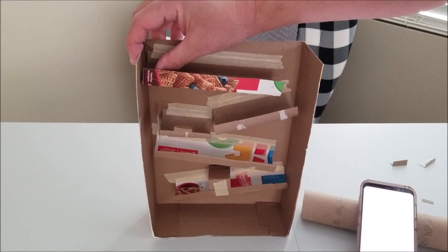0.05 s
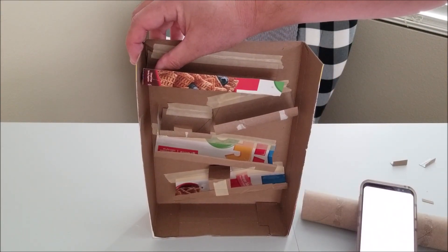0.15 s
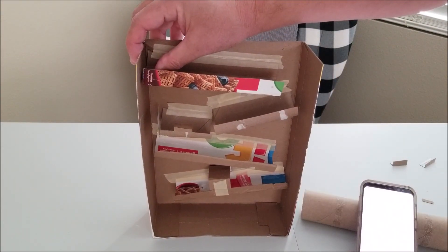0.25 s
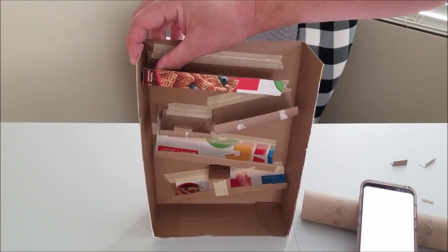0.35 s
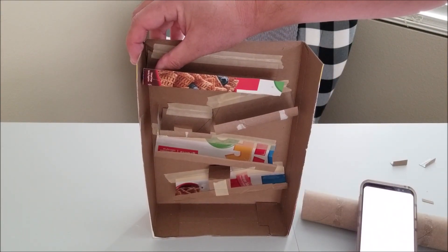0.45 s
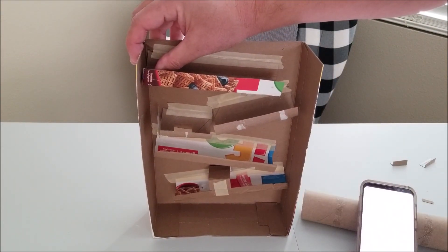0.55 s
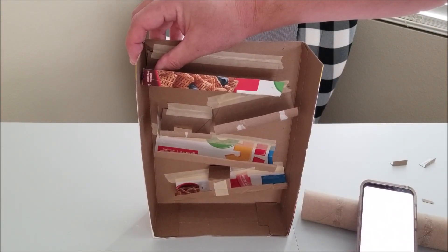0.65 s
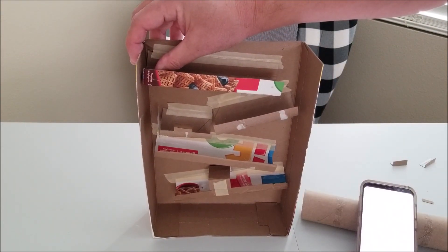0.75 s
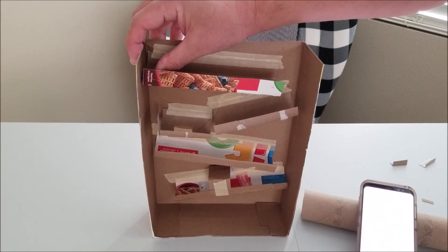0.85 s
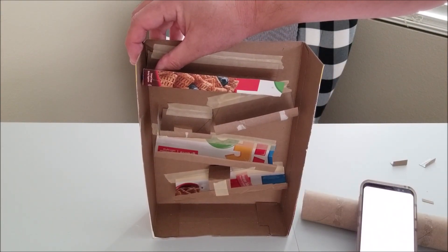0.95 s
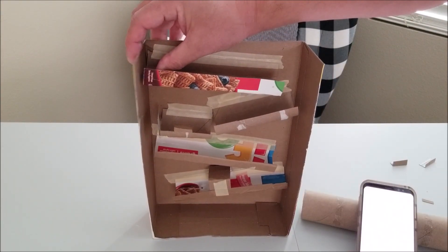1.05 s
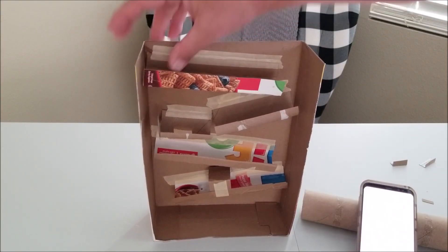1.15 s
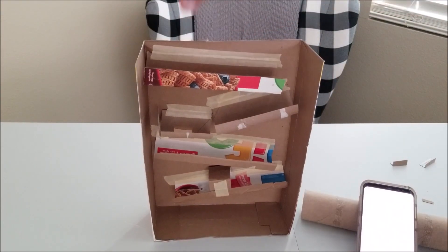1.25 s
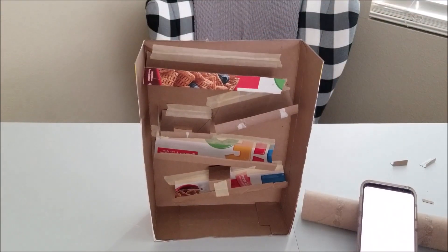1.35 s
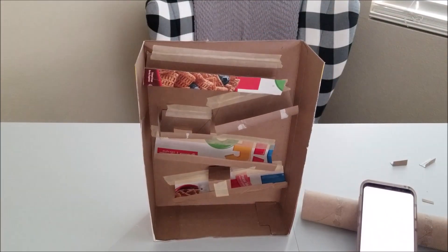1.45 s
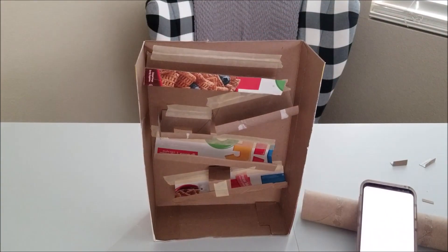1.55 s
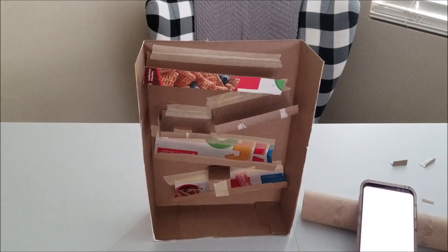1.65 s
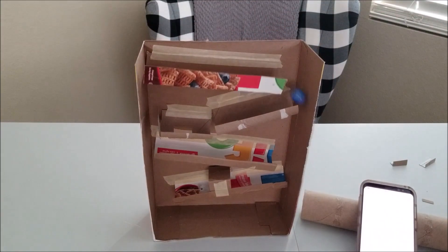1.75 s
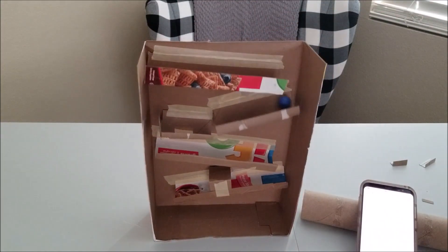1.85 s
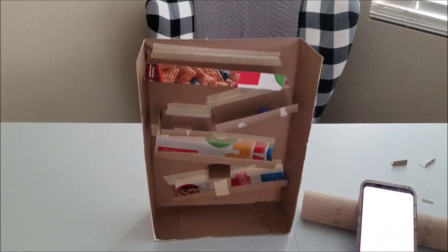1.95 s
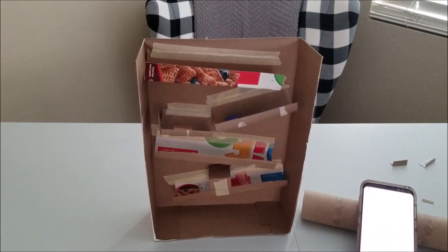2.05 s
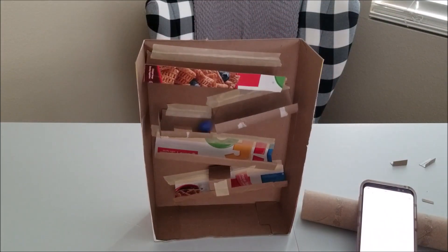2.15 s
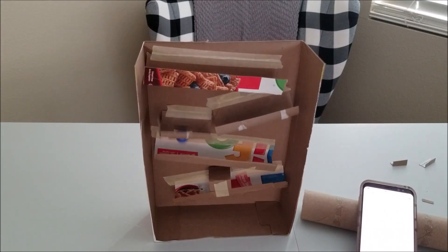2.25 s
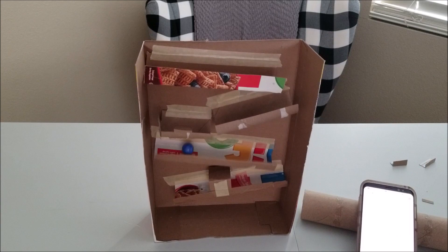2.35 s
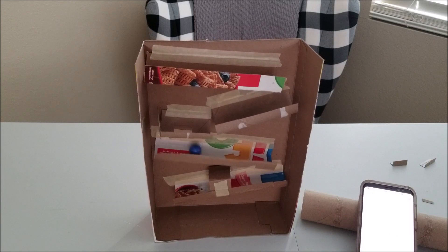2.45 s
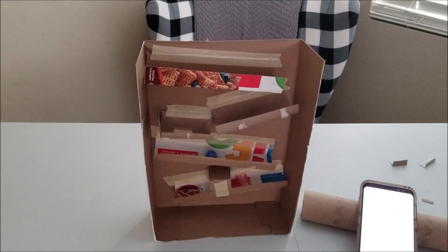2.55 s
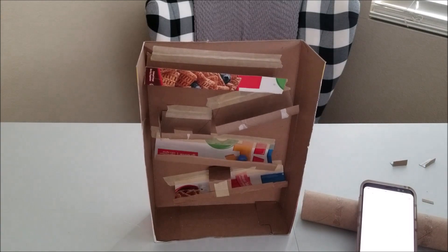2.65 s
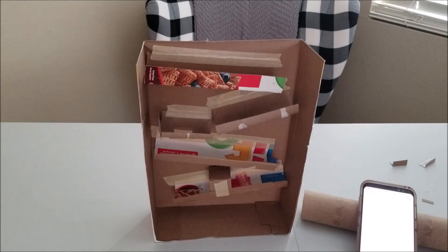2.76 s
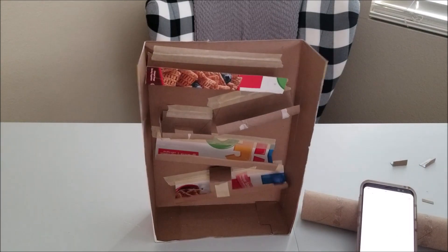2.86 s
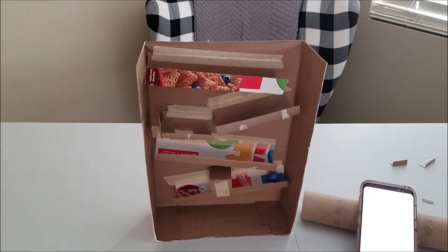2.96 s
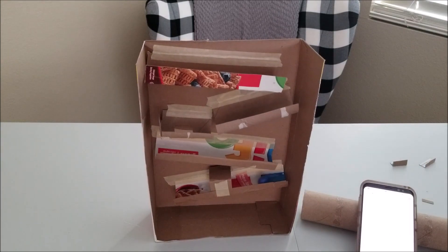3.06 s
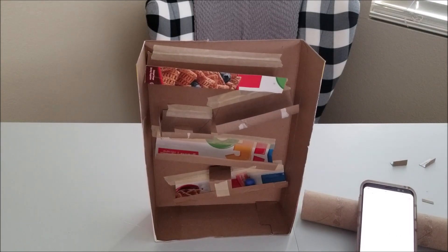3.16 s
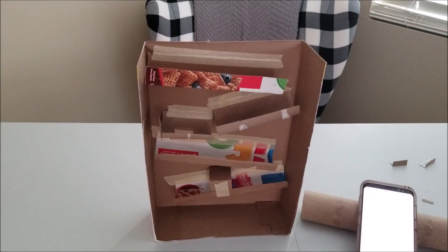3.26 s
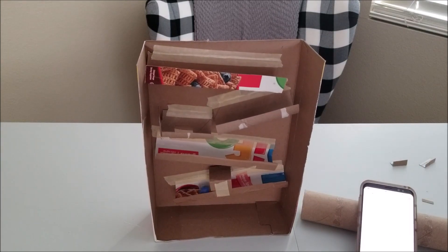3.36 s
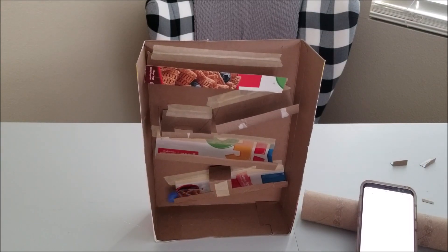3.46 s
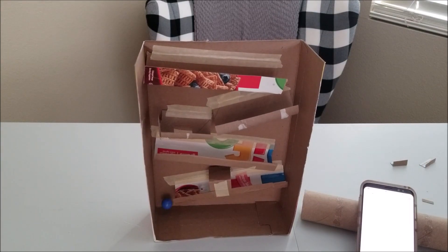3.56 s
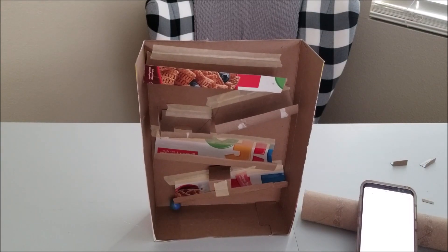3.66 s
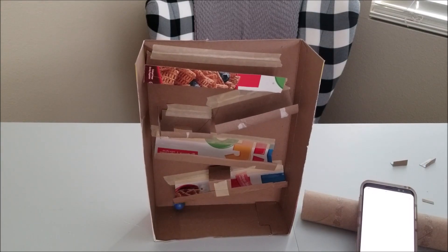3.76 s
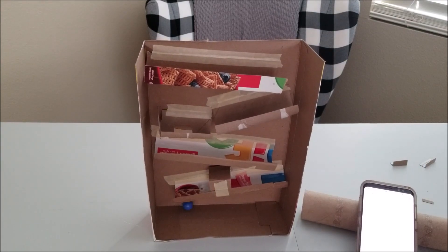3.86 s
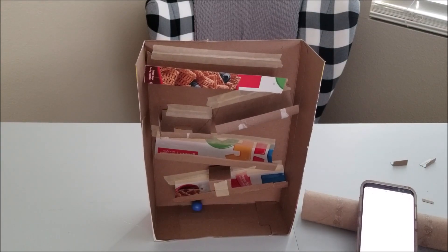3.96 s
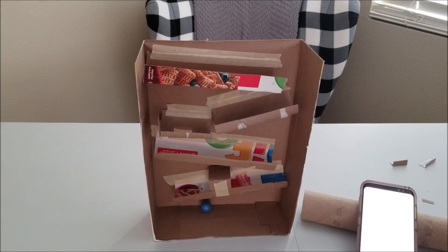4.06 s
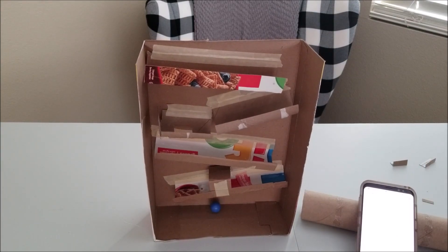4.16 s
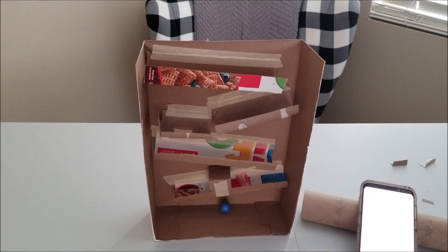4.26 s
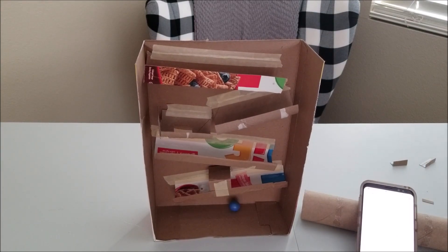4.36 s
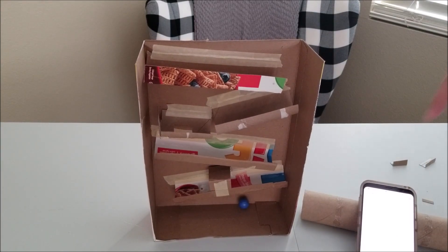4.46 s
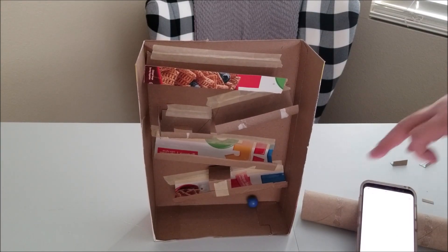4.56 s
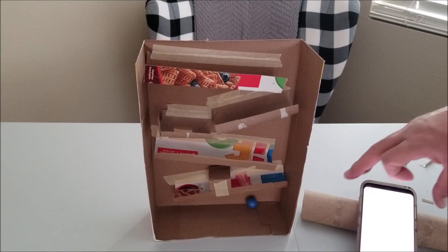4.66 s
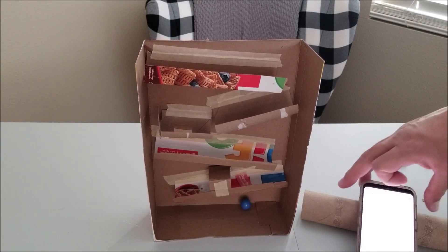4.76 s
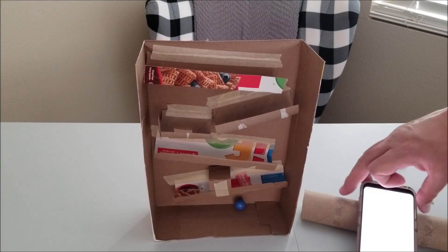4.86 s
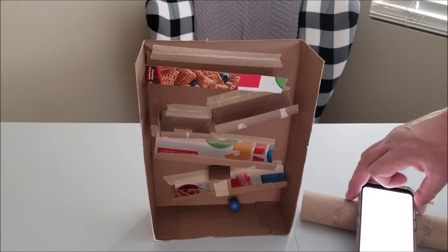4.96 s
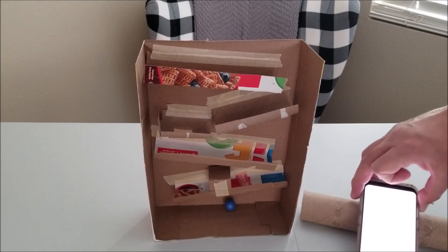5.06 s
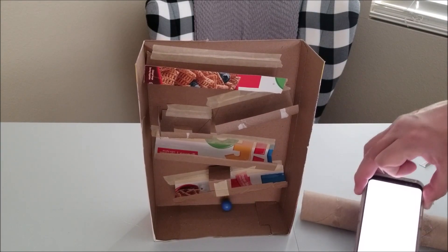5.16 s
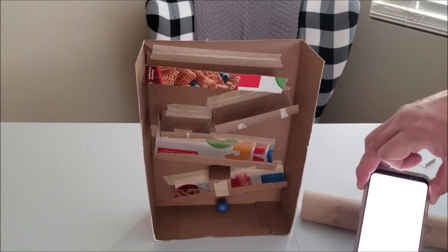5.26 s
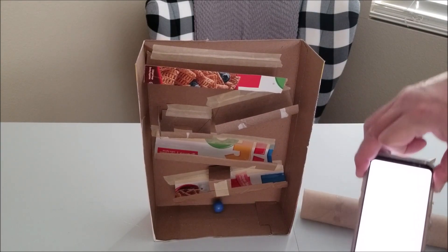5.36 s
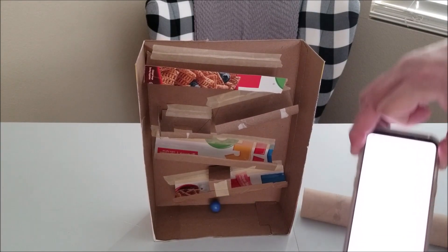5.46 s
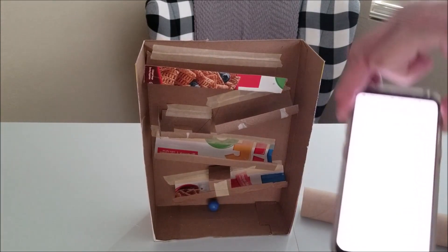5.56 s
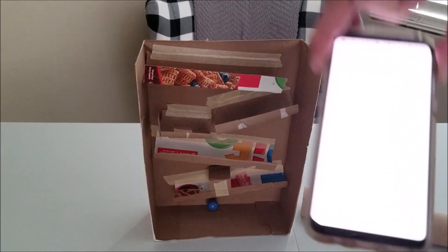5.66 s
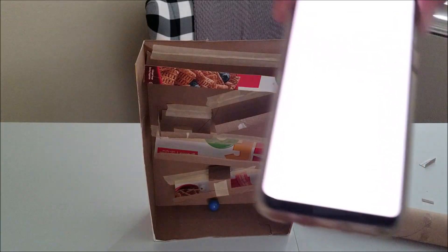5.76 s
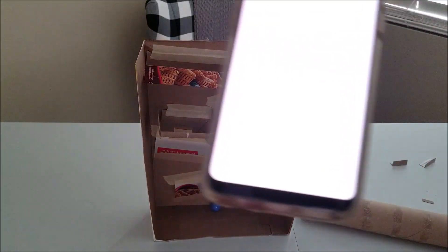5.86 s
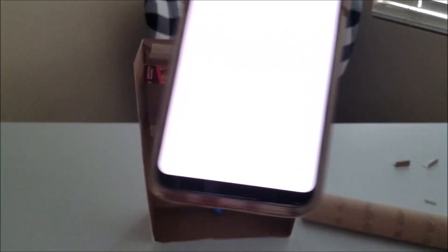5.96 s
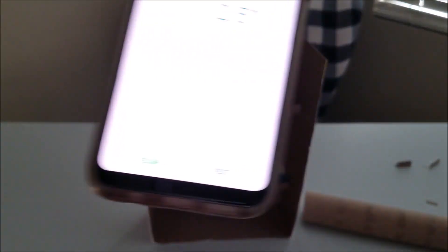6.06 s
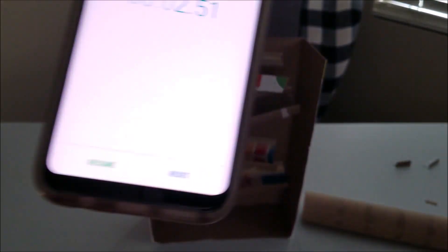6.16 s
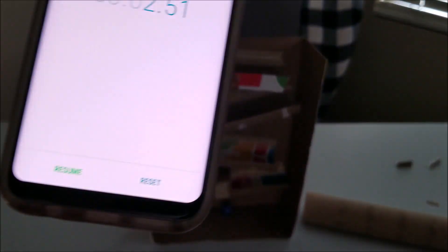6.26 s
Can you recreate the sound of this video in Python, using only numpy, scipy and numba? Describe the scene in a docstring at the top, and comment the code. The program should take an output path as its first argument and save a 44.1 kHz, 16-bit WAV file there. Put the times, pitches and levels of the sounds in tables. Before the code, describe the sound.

A marble rolls down a cardboard ramp run, dropping between ramps with hollow knocks, rocks to rest, then faint taps of a hand lifting a phone.

```python
"""Marble in a cardboard box

Place: a small quiet room, a cardboard box on a table, a stereo pair of microphones close by. A glass marble
rolls down four ramps, drops from one to the next, bounces and rocks to rest on the box floor; then a hand lifts
a phone off a cardboard tube. Blows ring the modes of the box and crack as noise bursts; rolling is dense random
bumps through the same modes. Contacts are short rings and bursts, swells of hiss are shaped noise; further off
lie table boom, a short room tail, house hum and steady hiss."""
import sys
import numpy as np
from scipy import signal
from scipy.fft import rfft, irfft, next_fast_len
from scipy.io import wavfile
from scipy.ndimage import uniform_filter1d
from numba import njit

SR = 44100
rng = np.random.default_rng(int(sys.argv[2]) if len(sys.argv) > 2 else 0)


def log_audio(samples):
    """Write samples as a 16-bit WAV file to the path given in sys.argv[1]."""
    # one column per channel
    frames = np.atleast_2d(samples).T
    # limit to full scale, then quantise
    limited = np.clip(frames, -1, 1)
    pcm = np.round(limited * 32767).astype(np.int16)
    wavfile.write(sys.argv[1], SR, pcm)


N = 278727

# Marble blows; levels are drives, trimmed per layer: (time [s], ramp ring [dB], struck spot pitch [Hz],
# box walls [dB], panel [dB], panel pitch [Hz], click [dB], top of click [dB])
MARBLE_BLOWS = [(1.142, -48, 1660, -44.5, -45, 467, -69, -58),
                (1.168, -36, 1720, -64, -47.5, 470, -53.5, -65),
                (1.196, -43, 1680, -47.5, -69, 600, -68, -72),
                (1.254, -48, 1500, -79, -68, 436, -73, -56.5), (1.506, -36, 1060, -52, -59, 670, -53, -64),
                (1.574, -42.5, 1650, -71, -47.5, 620, -52, -65),
                (1.709, -34.5, 1330, -55, -68, 710, -52, -55),
                (1.756, -42, 1800, -72, -52, 640, -56.5, -48),
                (1.826, -22.5, 840, -28, -24, 740, -40.5, -35.5),
                (1.836, -36, 870, -30, -26.5, 480, -45, -60), (1.85, -25.5, 1360, -33, -39, 720, -54, -48),
                (1.894, -49, 1500, -38, -36, 408, -49.5, -66),
                (1.953, -37.5, 1430, -49, -34.5, 407, -45.5, -47),
                (2.044, -35, 880, -44, -38.5, 400, -58, -50),
                (2.122, -32.5, 1150, -46, -37, 477.4, -82, -63),
                (2.202, -27.5, 1900, -28.5, -25, 561.6, -40.5, -35.5),
                (2.26, -34.5, 1070, -33, -30.5, 410, -49, -45),
                (2.337, -31.5, 1300, -41, -48, 794, -43.5, -37),
                (2.346, -17.5, 1550, -28, -32, 779, -25.5, -29.5),
                (2.45, -20.5, 1190, -49, -62.5, 790, -36, -51),
                (2.456, -19.5, 830, -29.5, -44, 732, -41.5, -45),
                (2.472, -43, 1280, -52.5, -57.5, 770, -42, -51),
                (2.501, -25.5, 1140, -55.5, -67.5, 789, -35.5, -45),
                (2.546, -30, 960, -39, -74, 748, -45, -44), (2.557, -33, 1760, -44, -47, 720, -36, -40),
                (2.567, -32.5, 963, -43.5, -64, 729, -42.5, -46),
                (2.624, -34.5, 870, -47, -54.5, 790, -51.5, -75),
                (2.779, -38, 1070, -58.5, -46.5, 377, -54.5, -53),
                (2.865, -25.5, 890, -28.5, -22, 550, -58, -45),
                (2.897, -25.5, 2120, -32.5, -32.5, 556, -41.5, -46.5),
                (2.923, -19.5, 1480, -31, -36, 725, -29.5, -30.5),
                (2.996, -26, 1340, -35.5, -40, 374, -31.5, -41),
                (3.017, -38, 1370, -42, -43.5, 470, -39, -49),
                (3.109, -36, 2680, -47.5, -49, 789, -49, -46.5),
                (3.12, -40.5, 810, -55.5, -60, 420, -53, -69),
                (3.266, -39.5, 2570, -46, -80, 800, -47.5, -45.5),
                (3.413, -38, 1400, -54.5, -72.5, 777, -42, -44.5),
                (3.463, -33.5, 750, -44.5, -43.5, 766, -46.5, -44.5),
                (3.537, -19.5, 950, -30, -28, 634, -33.5, -32),
                (3.565, -18, 745, -22.5, -23.5, 738, -24.5, -27),
                (3.67, -27, 1260, -27.5, -30.5, 640, -30.5, -30),
                (3.747, -32.5, 1010, -29.5, -34.5, 382, -32.5, -34),
                (3.804, -37.5, 1020, -47, -35.5, 470, -44.5, -50),
                (3.846, -35, 947, -38.5, -38.5, 640, -42, -32),
                (3.876, -40.5, 904, -39, -43, 563, -45.5, -53),
                (3.895, -39, 820, -40.5, -45.5, 550, -51, -52)]
# Contacts of hand, phone and tube; levels are drives: (time [s], ring [dB], pitch [Hz], second ring [dB],
# second pitch [Hz], thud [dB], click [dB], left minus right [dB])
HAND_CONTACTS = [(4.543, -41.5, 1147, -72, 1300, -53, -57, 7.5), (4.55, -35, 580, -79, 1330, -56, -60.5, 3),
                 (4.6, -37.5, 1070, -80.5, 1570, -75.5, -77, 7), (4.672, -35, 807, -63, 1760, -52, -53, 7),
                 (4.688, -30.5, 723, -60, 1750, -59, -63, 12), (4.7, -41, 730, -60, 1810, -47, -49, 8.5),
                 (5.025, -40, 606, -56, 1230, -54, -60, 2), (5.044, -43, 790, -62, 1383, -54, -73, 12.5),
                 (5.068, -47, 734, -73, 1420, -58.5, -72, -12),
                 (5.109, -54, 700, -88, 1440, -61.5, -80, 11),
                 (6.147, -41, 3430, -57, 1750, -70, -52, -0.5), (6.161, -51, 3670, -63, 1690, -64, -66, 8),
                 (6.187, -33, 3490, -59, 2780, -62.5, -52, 5.5),
                 (6.198, -61.5, 3580, -63.5, 2710, -85, -72, 1.5),
                 (6.216, -52, 3740, -66, 2754, -82, -63, 4.0)]
# Rolling, one list per ramp and one for the bounces on the box floor: (time [s], ramp [dB], rattle [dB],
# panel [dB], box walls [dB], ramp pitch [Hz])
ROLLING_PATH = [
    [(1.1, -75, -79, -87, -74, 1617), (1.172, -71, -79, -82, -65, 1600),
     (1.3, -70.5, -73.5, -88, -71.5, 1490), (1.506, -56.5, -59.5, -58.5, -58.5, 1144),
     (1.62, -54, -58, -58, -60, 1170), (1.644, -52, -52, -57.5, -59, 1359),
     (1.692, -51, -53.5, -56, -61.5, 1218), (1.758, -49.5, -50, -47.5, -55.5, 1353),
     (1.815, -88, -73, -73, -64, 1352)],
    [(1.83, -51, -50, -50, -54, 1074), (1.93, -54.5, -60.5, -52, -56, 1366),
     (1.978, -52.5, -60.5, -54, -56, 1404), (2.018, -59, -63.5, -49, -51.5, 950),
     (2.226, -56, -65.5, -51.5, -48.5, 1118), (2.282, -55.5, -65, -53, -54.5, 1049),
     (2.302, -67, -71, -64, -50, 1500), (2.38, -62, -53.5, -61.5, -48.5, 1518),
     (2.44, -54.5, -63, -61.5, -53.5, 1470)],
    [(2.45, -63, -57.5, -58.5, -57, 1018), (2.522, -56.5, -53.5, -63.5, -56, 1160),
     (2.544, -57, -63, -61, -51.5, 1036), (2.642, -53, -59.5, -67.5, -57.5, 965),
     (2.742, -51, -60, -61, -52.5, 1107), (2.778, -51.5, -60, -61.5, -59, 1010),
     (2.83, -51.5, -56, -61, -57.5, 1191), (2.86, -57.5, -63, -63, -55, 1066)],
    [(2.87, -53, -60, -59, -53.5, 1042), (2.91, -50.5, -57, -61, -64.5, 1469),
     (2.962, -55, -60, -56.5, -44, 1430), (3.09, -62.5, -68.5, -72, -55, 1300),
     (3.192, -65, -71, -74.5, -59, 1405), (3.242, -66.5, -68, -84, -58.5, 1100),
     (3.31, -63.5, -65, -79.5, -54, 1180), (3.41, -61, -58, -73.5, -50.5, 1500),
     (3.53, -62.5, -68.5, -64.5, -57, 1035)],
    [(3.54, -58, -52.5, -64, -51.5, 1081), (3.588, -56, -54, -59.5, -53, 1020),
     (3.612, -57, -55, -58.5, -50.5, 1183), (3.702, -59, -59, -58.5, -48, 1161),
     (3.752, -57, -56, -65, -45, 1051), (3.798, -57, -60, -65, -49.5, 1070),
     (3.886, -80, -69, -73, -55, 930), (3.952, -79, -77, -74, -61, 1002),
     (4.08, -85, -88, -88.5, -77, 1375)],
]
# Modes of the box, walls first, then panels and ramps; each layer may shorten the decay:
# (frequency [Hz], relative level [dB], t60 [s])
BOX_MODES = [(140.6, 0, 0.25), (203.5, 1, 0.1), (236.5, -7, 0.23), (269.7, 2.5, 0.13), (331.5, -3.5, 0.23),
             (389.4, 1.5, 0.094), (470, -0.5, 0.12), (565.8, -1, 0.15), (640, -2.5, 0.12), (713, -1, 0.057),
             (868, 6, 0.037), (1010, 5, 0.031), (1190, 12, 0.016), (1430, 9.5, 0.027), (1583, 13, 0.016),
             (1900, 3, 0.069), (2198, 6, 0.017), (2404, 2, 0.017), (2780, -7.5, 0.12), (3230, -7.5, 0.023),
             (3430, -12.5, 0.01), (4100, -12, 0.022)]
# Spectrum shape of room hum and microphone hiss: (frequency [Hz], relative density [dB per Hz])
AIR_SPECTRUM = [(15, -57.5), (30, -16), (50, -9), (114, -2.5), (163, -2), (200, -10), (280, -7),
                (330, -14.5), (500, -25), (1900, -28.5), (4500, -35.5), (8400, -44), (11500, -26.5),
                (16500, -23)]
# Each piece of card, in the order of ROLLING_PATH: (fine hiss against rattle [dB], top hiss against rattle [dB],
# rolling panel pitch [Hz], rolling wall pitch [Hz], blow wall pitch [Hz], blow left minus right [dB])
CARD_PIECES = [(-11.5, -11, 670, 220, 162, 3.1), (-3.5, -2.5, 420, 245, 270, 2.7),
               (-6.5, -6.5, 400, 215, 160, 2.6), (-4, -12.5, 390, 220, 270, 3.7),
               (-1.5, -7.5, 550, 200, 180, 2.8)]
# The marble rocks to and fro on the box floor, one swell a swing:
# (middle time [s], length [s], box walls [dB], panel [dB])
FLOOR_SWINGS = [(4.104, .12, -60.5, -83), (4.215, 0.2, -59.5, -70), (4.354, 0.14, -53.5, -74.5),
                (4.55, 0.18, -57, -73), (4.719, 0.16, -59.5, -75), (5.05, 0.31, -64, -71.5),
                (5.39, 0.28, -66.5, -87), (5.826, 0.31, -71.5, -74)]
# Swells of hiss: fine and top hiss that rises, holds and fades, some with mid-band noise:
# (start time [s], rise [s], hold [s], fall [s per 20 dB, at least 0.01],
# 0.6-2.3 kHz level [dB], 3.2-7.1 kHz level [dB], 10.5-18 kHz level [dB])
HISS_SWELLS = [(1.11, 0.029, 0.053, 0.34, -64, -69, -67.5), (1.265, 0.053, 0.067, 0.12, -87, -65, -53.5),
               (3.238, 0.18, .02, 0.05, -74, -71.5, -66), (3.748, 0.12, 0.082, 0.19, -74, -64.5, -56),
               (4.506, 0.035, 0.075, -0.37, -76, -80, -76.5), (4.66, 0.014, .03, 0.15, -67.5, -69, -80),
               (4.897, 0.08, 0.035, 0.2, -75.5, -76, -72), (6.127, 0.053, 0.019, .2, -84, -83, -75)]

PANEL_HZ, RAMP_HZ = 370, 800  # walls ring below the first, panels between, ramps above the second
SETTLE_PANEL_HZ, SETTLE_WALL_HZ = 420, 205  # pitches while the marble rocks on the floor
SNAP_DB, SNAP_CLICK_SHARE = -4.5, 0.67  # trim; place of the snap between ramp ring (0) and click (1)
RING_SHARE = 0.68  # ramp decay of a blow, as a share of the mode's t60
BOOM_DB, BOOM_ROLL_DB = -18.5, -16.5  # table boom against a blow's walls and against rolling walls
BOOM_S = 0.029  # time from a blow to the boom's peak
ROOM_T60_S, ROOM_DB = 0.2, -6
AIR_DB = -68.5  # level of the part common to both microphones, before the left-right offset
TOP_HZ = 15950


def knocks(spread_oct=0.31, scatter_db=3.5, detune=0.037):
    """Each blow rings all modes of the box; modes near the pitches of the struck spot ring most."""
    s, ramp_db, spot_hz, wall_db, panel_db, panel_hz, click_db, top_db = np.transpose(MARBLE_BLOWS)
    wall_hz, pan_db = card_at(s)[-2:]
    snap_db = SNAP_DB + ramp_db + SNAP_CLICK_SHARE * (click_db - ramp_db)
    chance = rng.standard_normal((len(s), 3, 2 * len(BOX_MODES)))
    out = crack(blows(s, undb(click_db), pan_db), 4000, 9500, 0.0023)
    out += crack(blows(s, undb(top_db), pan_db + 2.0), 11000, 17000, 0.0026)
    out += crack(blows(s, undb(snap_db), pan_db), 2000, 3790, 0.0069)
    # uneven card splits every mode into a close pair
    hz, mode_db, t60 = np.repeat(np.transpose(BOX_MODES), 2, axis=1)
    is_wall, is_panel = hz < PANEL_HZ, hz < RAMP_HZ  # walls are picked out first
    decay_s = np.maximum(t60 * np.where(is_panel, 1, RING_SHARE), .005)
    sign = (-1) ** (np.arange(len(hz)) // 2)
    # slower blows stay in contact longer
    contact_ms = np.clip(0.17 * undb(-.7 * (ramp_db + 24.5)), .05, 5.0)
    t = np.arange(8192) / SR
    for k in range(len(s)):
        scatter, shift, phase = chance[k]
        place_hz = np.where(is_wall, wall_hz[k], np.where(is_panel, panel_hz[k], spot_hz[k]))
        near_db = np.maximum(-6 * (np.log2(hz / place_hz) / spread_oct) ** 2, -10)
        part_db = np.where(is_wall, wall_db[k] - 7.0, np.where(is_panel, panel_db[k] - 9.5, ramp_db[k] - 12))
        gain = sign * undb(part_db + near_db + mode_db + scatter_db * scatter)
        # each mode is detuned a little at random from blow to blow
        pole = 2j * np.pi * hz * (1 + detune * shift) - np.log(1000) / decay_s
        # short waves reach the two microphones out of step
        step = np.exp(1j * np.outer([1, -1], phase * hz / 3000))
        step = step * undb(np.array([[pan_db[k]], [-pan_db[k]]]) / 2)
        ringing = np.imag((gain * step) @ np.exp(np.outer(pole, t)))
        # the ring builds up over the contact
        build_up = 1 - np.exp(-t * 1000 / contact_ms[k])
        at = int(s[k] * SR)
        out[:, at:at + len(t)] += ringing * build_up
    return out


def rolling(bumps_per_s=3000, bump_db=2.5):
    """The marble runs over the grain of the card: dense uneven bumps shake ramp, panels, walls and table."""
    ramp_gain, rattle_gain, panel_gain, wall_gain, ramp_hz, card = course()
    panel_hz, wall_hz = card[2:4]
    t = np.arange(N) / SR
    settling = t > ROLLING_PATH[-1][-1][0]
    for s, length_s, wall_db, panel_db in FLOOR_SWINGS:
        swing = np.cos(np.pi * np.clip((t - s) / length_s, -.5, .5))
        wall_gain = wall_gain + undb(wall_db) * swing
        panel_gain = panel_gain + undb(panel_db) * swing
    panel_hz = np.where(settling, SETTLE_PANEL_HZ, panel_hz)
    wall_hz = np.where(settling, SETTLE_WALL_HZ, wall_hz)
    size_db = bump_db * np.minimum(rng.exponential(size=(2, N)), 3.0) + 2.0 * walk(60)
    hits = rng.random((2, N)) < bumps_per_s / SR
    shared, apart = hits * undb(size_db) * np.sign(rng.standard_normal((2, N)))
    bumps = shared + 0.46 * apart * np.array([[1], [-1]])  # left, right
    # where the marble is decides which modes of wall and ramp it shakes most
    walls = unit(svf(box_modes(bumps[0], 100, PANEL_HZ, 0.49), wall_hz, 2.5))
    panels = unit(svf(box_modes(bumps[0], PANEL_HZ, RAMP_HZ, 0.36), panel_hz, 6.7))
    ramp = box_modes(bumps, RAMP_HZ, 1700, 1.0) + .8 * unit(band(bumps, 800, 1800))
    ramp = unit(np.array([svf(side, ramp_hz, 4.6) + 0.19 * side for side in ramp]))
    rattle = unit(box_modes(bumps, 1500, 3500, .4) + .5 * unit(band(bumps, 1500, 3500)))
    body = ramp_gain * ramp + rattle_gain * rattle + panel_gain * panels + wall_gain * walls
    return (body + boom(wall_gain)) * undb(np.array([[1.6], [-1.6]]))


def box_modes(x, lo_hz, hi_hz, decay_share):
    """Pushes ring the box modes of one frequency range, at rms 1."""
    total = sum(undb(db) * ring(x, hz, decay_share * t60) for hz, db, t60 in BOX_MODES if lo_hz < hz < hi_hz)
    return unit(band(total, lo_hz, hi_hz))


def course():
    """Rolling controls, one value a sample: gains of ramp, rattle, panel and walls, ramp pitch, the card underneath."""
    t = np.arange(N) / SR
    s, *levels_db, ramp_hz = np.concatenate(ROLLING_PATH).T
    moving = (t > s[0]) & (t < s[-1])
    gains = [moving * undb(np.interp(t, s, db)) for db in levels_db]
    return gains + [np.interp(t, s, ramp_hz), card_at(t)]


def card_at(s):
    """Columns of CARD_PIECES for the card under the marble at each time."""
    changes_s = [piece[0][0] - .01 for piece in ROLLING_PATH[1:]]
    return np.array(CARD_PIECES, float)[np.searchsorted(changes_s, s)].T


def boom(wall_gain):
    """The table under the box booms late after every blow and rumbles under the rolling."""
    s, wall_db = np.transpose(MARBLE_BLOWS)[[0, 3]]
    coarse_t = np.arange(N)[None, ::64] / SR
    age = np.maximum(coarse_t - s[:, None], 0) / BOOM_S
    swell = np.sqrt(undb(2 * (wall_db + BOOM_DB)) @ (age * np.exp(1 - age)) ** 2)  # powers add
    noise = rng.standard_normal(N) + 0.41 * rng.standard_normal((2, N))
    noise = unit(band(band(noise, 41, 97), 31, 160))
    return noise * (np.repeat(swell, 64)[:N] + undb(BOOM_ROLL_DB) * wall_gain)


def taps():
    """Light contacts of fingers, phone case and tube: a short ring, a broad knock, a dull thud, a tick."""
    s, ring_db, pitch_hz, second_db, second_hz, thud_db, click_db, pan_db = np.transpose(HAND_CONTACTS)
    out = crack(blows(s, undb(click_db), pan_db), 2200, 24000, 0.00092)
    out += ring(blows(s, undb(thud_db - 2.5), pan_db), 181.4, 0.11)
    out += ring(blows(s, undb(thud_db - 3.5), pan_db), 130, 0.28)
    knock = crack(blows(s, undb(ring_db - 8.5), pan_db), 309, 2900, 0.0061)
    push = blows(s, 1, pan_db)
    edges = np.append((s * SR).astype(int), N)
    for k in range(len(s)):
        # the knock is tuned around this contact's pitch until the next contact
        now = slice(edges[k], edges[k + 1])
        out[:, now] += band(knock[:, now], .7 * pitch_hz[k], 1.3 * pitch_hz[k])
        # this contact alone, spread over five samples
        tail = slice(edges[k], edges[k] + 4096)
        one = push[:, tail] * (np.arange(N)[tail] == edges[k])
        one = uniform_filter1d(one, size=5, origin=2)
        out[:, tail] += undb(ring_db[k] - 15) * ring(one, pitch_hz[k], 0.023)
        out[:, tail] += undb(second_db[k] - 6.0) * ring(one, second_hz[k], 0.068)
    return out


def hiss():
    """Fine flickering noise, mostly unrelated at the two microphones, follows the rolling and rises in swells."""
    _, rattle_gain, *_, card = course()
    t = np.arange(N) / SR
    gains = np.array([0 * rattle_gain, rattle_gain * undb(card[0]), rattle_gain * undb(card[1])])
    for s, rise_s, hold_s, fall_s, *db in HISS_SWELLS:
        rise = np.clip((t - s) / max(rise_s, .003), 0, 1) ** 2
        fall = undb(-20 * np.maximum(t - s - rise_s - hold_s, 0) / max(fall_s, .01))
        gains = gains + undb(db)[:, None] * rise * fall
    mid = unit(band(rng.standard_normal(N) + .6 * rng.standard_normal((2, N)), 600, 2300))
    mid = undb(3.0 * walk(90)) * mid
    fine = unit(band(rng.standard_normal((2, N)), 3200, 7100))
    top = unit(band(rng.standard_normal((2, N)), 10500, 18000))
    both = gains[0] * mid + undb(1.5 * walk(30)) * (gains[1] * fine + gains[2] * top)
    return both * undb(np.array([[1.8], [-1.8]]))


def room(x):
    """Reflections of table and walls: a fading noise tail per microphone, alike in the bass."""
    t = np.arange(int(.5 * SR)) / SR
    shared, own = rng.standard_normal(len(t)), rng.standard_normal((2, len(t)))
    tail = band(shared, 40, 890) + undb(9) * band(own, 750, 5000) + undb(7.5) * band(own, 5500, 15000)
    fade = np.exp(-np.log(1000) * t / ROOM_T60_S) * (t > .003)  # first reflections after 3 ms
    tail = unit(tail) * fade * np.sqrt(2 * np.log(1000) / ROOM_T60_S / SR)  # near unit energy
    mono = np.tile(x.mean(axis=0), (2, 1))
    return undb(ROOM_DB) * signal.fftconvolve(mono, tail, axes=1)[:, :N]


def air():
    """Hum of the house, nearly the same at both microphones, under hiss that differs between them."""
    size = next_fast_len(N)
    hz = np.arange(size // 2 + 1) * SR / size + 1
    point_hz, point_db = np.transpose(AIR_SPECTRUM)
    gain = undb(np.interp(np.log(hz), np.log(point_hz), point_db))
    apart = np.clip(hz / 900, .15, .9)
    mid, side = (rfft(rng.standard_normal(size)) * gain for _ in range(2))
    mid, side = irfft(mid, size)[:N], irfft(side * apart, size)[:N]
    both = np.array([mid + side, mid - side]) / np.std(mid)
    return both * undb(AIR_DB + np.array([[2.0], [-2.0]]))


def undb(db):
    """Gain of a level in dB."""
    return 10 ** (np.asarray(db) / 20)


def unit(x):
    """Scale to rms 1."""
    return x / np.sqrt(np.mean(x ** 2))


def band(x, lo_hz, hi_hz):
    """Fixed band-pass."""
    sos = signal.butter(2, [lo_hz, min(hi_hz, .45 * SR)], "bandpass", fs=SR, output="sos")
    return signal.sosfilt(sos, x)


def ring(x, hz, t60):
    """One mode: a unit blow gives a fading sine that starts from height 1."""
    r, w = np.exp(-np.log(1000) / (max(t60, .003) * SR)), 2 * np.pi * hz / SR
    return signal.lfilter([0, r * np.sin(w)], [1, -2 * r * np.cos(w), r * r], x)


def blows(s, gain, pan_db):
    """Left and right trains of single-sample pushes."""
    out = np.zeros((2, N))
    out[:, (s * SR).astype(int)] = gain * undb(np.array([pan_db, -pan_db]) / 2)
    return out


def crack(push, lo_hz, hi_hz, decay_s):
    """Every push sets off a short burst of noise, partly different at the two microphones."""
    shape = signal.lfilter([1], [1, -np.exp(-1 / (decay_s * SR))], push)
    shape = uniform_filter1d(shape, size=21, origin=10)  # the burst takes half a millisecond to rise
    shared, own = rng.standard_normal(N), rng.standard_normal((2, N))
    return shape * unit(band(0.47 * shared + 1.0 * own, lo_hz, hi_hz))


def walk(rate):
    """Random levels, a new one every 1 / rate s, joined by slopes; spread near 1."""
    k = int(SR / rate)
    steps = np.repeat(rng.standard_normal(N // k + 1), k)
    return 1.2 * uniform_filter1d(steps, k)[:N]


@njit
def svf(x, hz, sharp):
    """State-variable band-pass whose centre moves."""
    y, b, l = np.empty(len(x)), 0., 0.  # b, l: band and low states
    for i in range(len(x)):
        g = np.tan(np.pi * hz[i] / SR)
        v = (b + g * (x[i] - l)) / (1 + g * (g + 1 / sharp))
        b, l, y[i] = 2 * v - b, l + 2 * g * v, v / sharp
    return y


def scene():
    """Marble and hand close by, their room tail, the swelling hiss, and the air."""
    near = knocks() + rolling() + taps()
    return near + room(near) + hiss() + air()


def record(dry):
    """The phone that records cuts the top steeply."""
    return signal.sosfilt(signal.ellip(8, .2, 70, TOP_HZ, fs=SR, output="sos"), dry)


dry = scene()
out = record(dry)
log_audio(out)
```